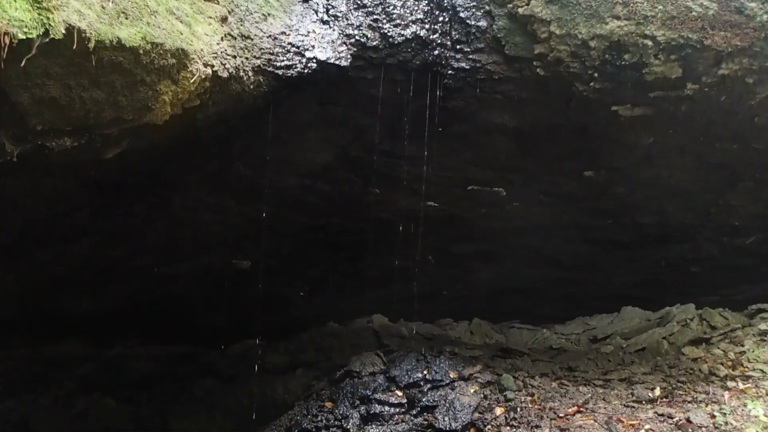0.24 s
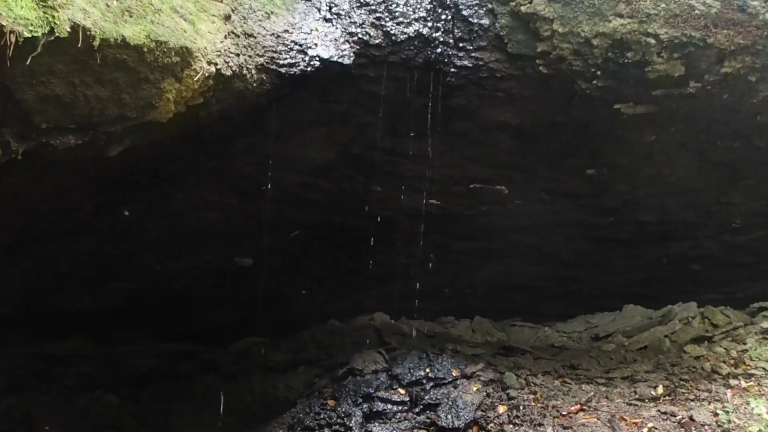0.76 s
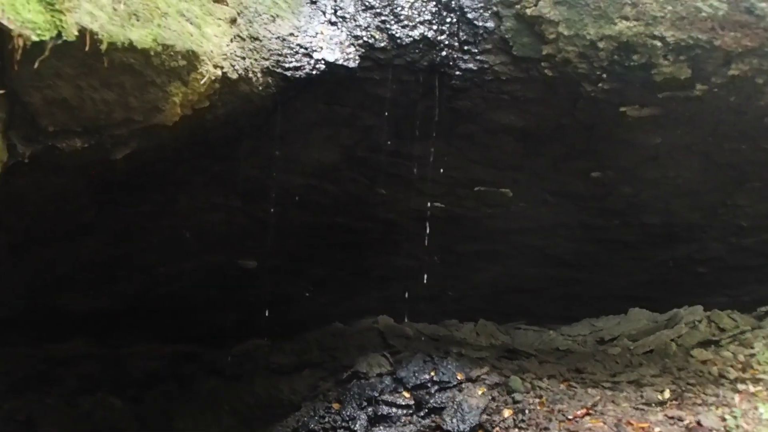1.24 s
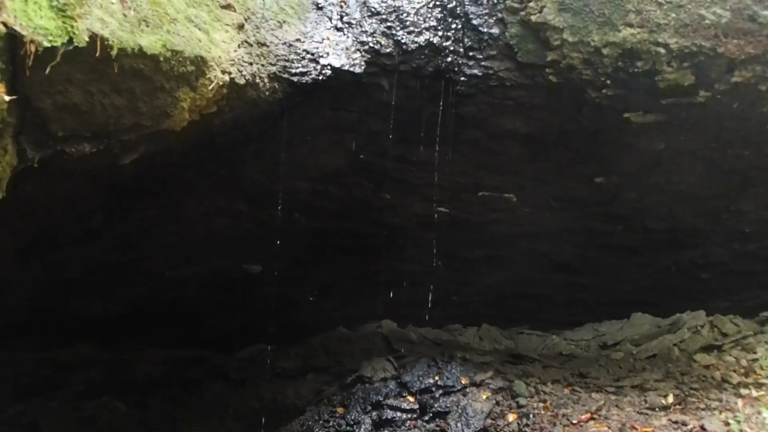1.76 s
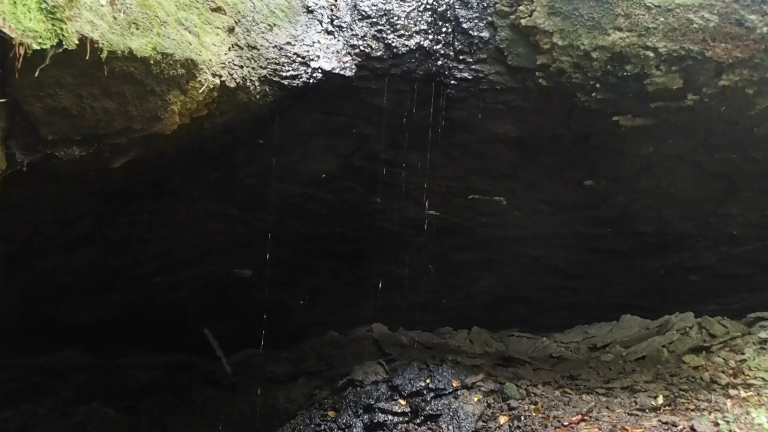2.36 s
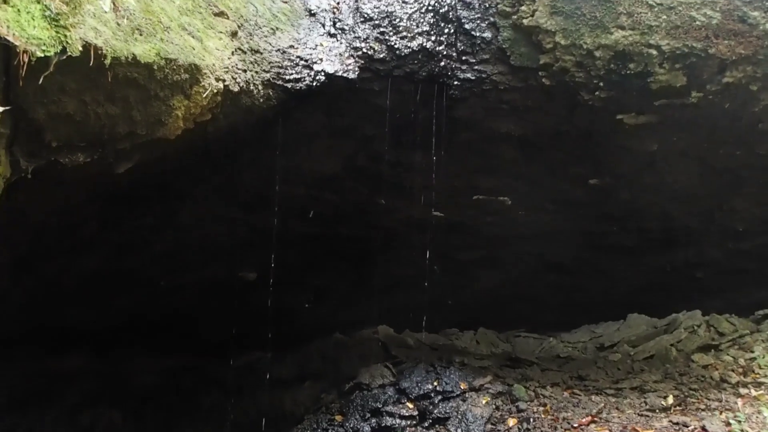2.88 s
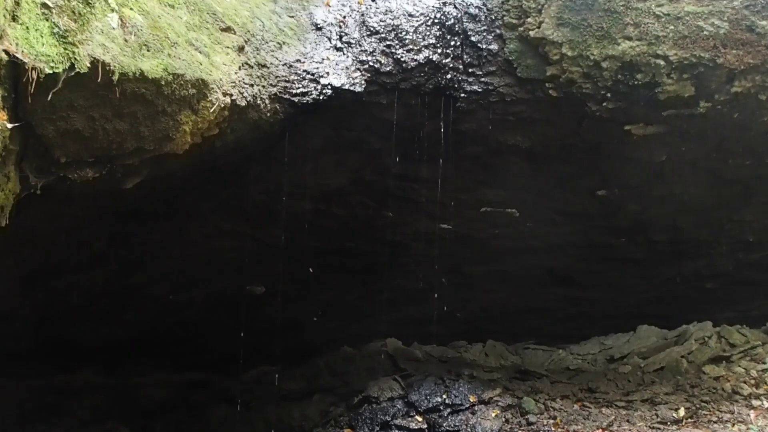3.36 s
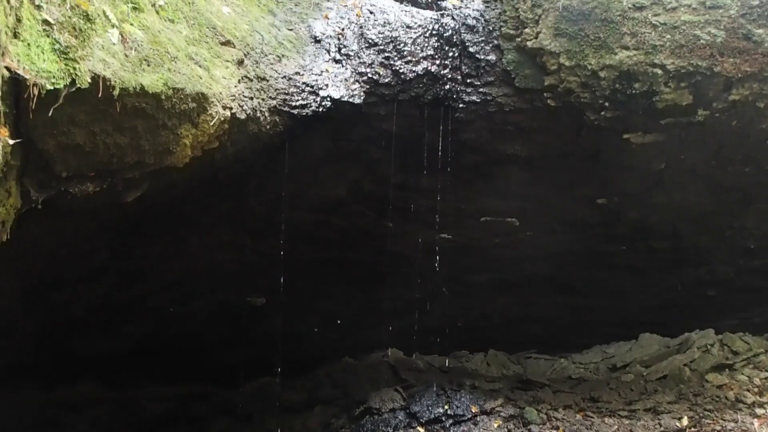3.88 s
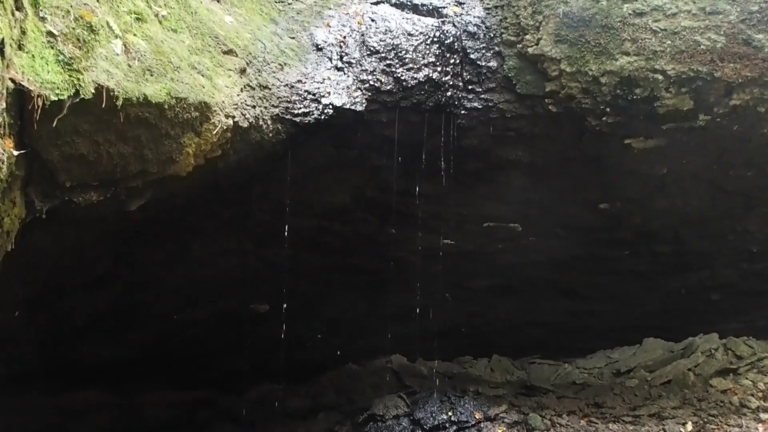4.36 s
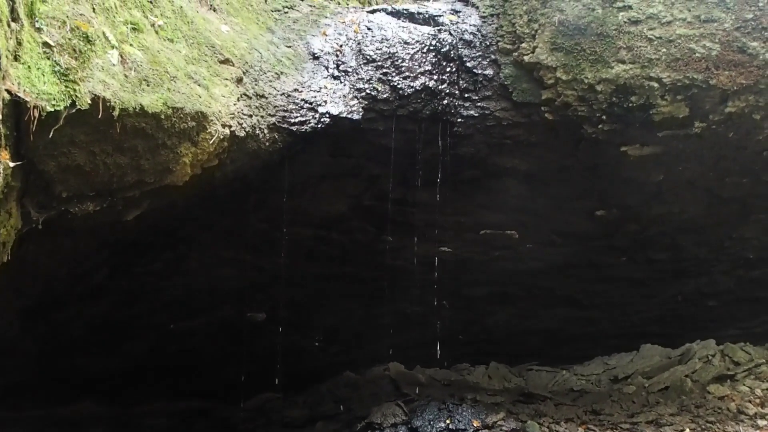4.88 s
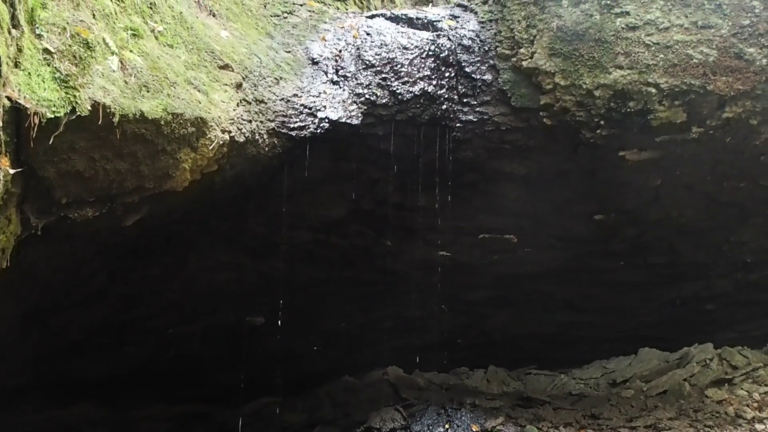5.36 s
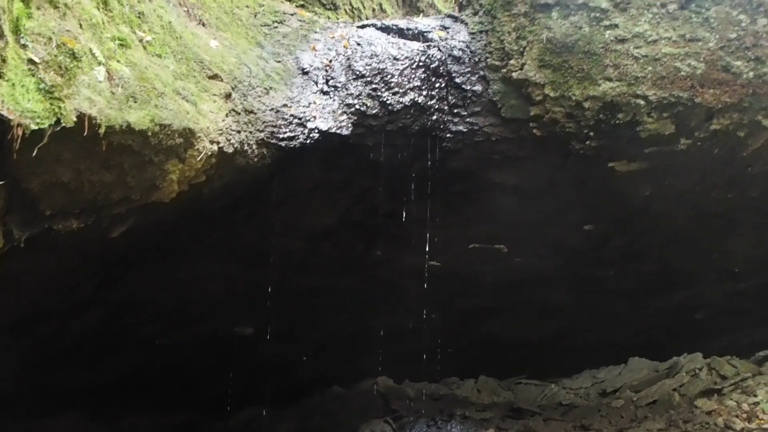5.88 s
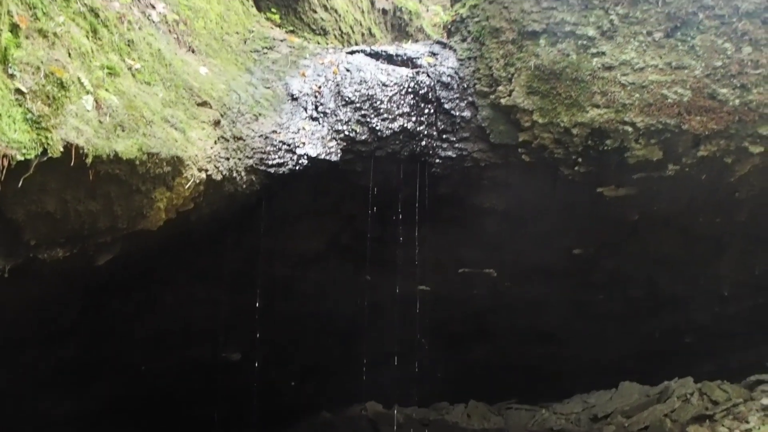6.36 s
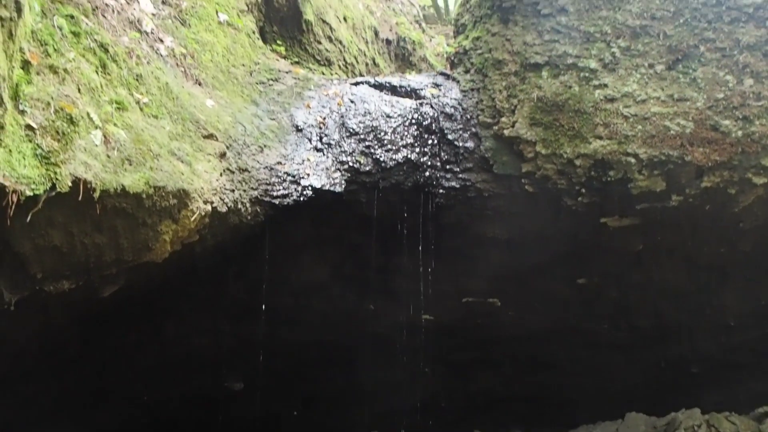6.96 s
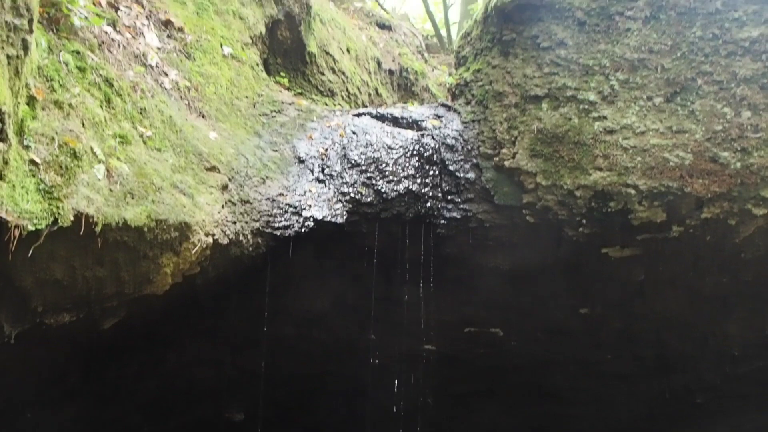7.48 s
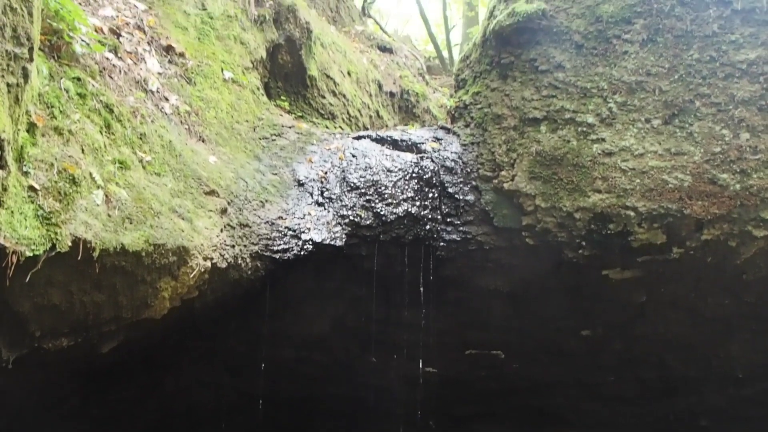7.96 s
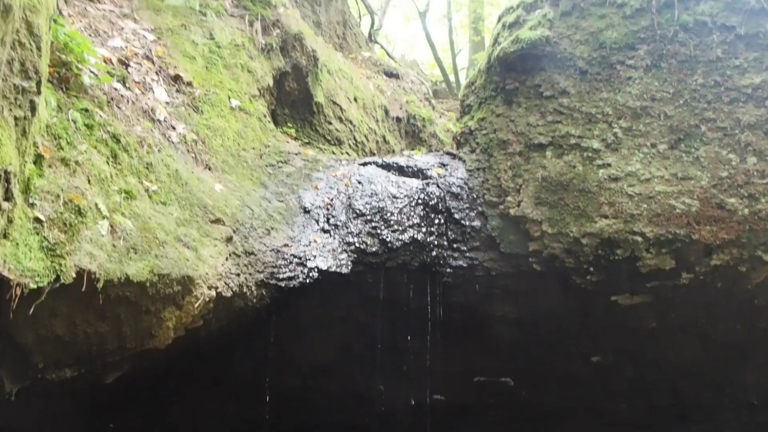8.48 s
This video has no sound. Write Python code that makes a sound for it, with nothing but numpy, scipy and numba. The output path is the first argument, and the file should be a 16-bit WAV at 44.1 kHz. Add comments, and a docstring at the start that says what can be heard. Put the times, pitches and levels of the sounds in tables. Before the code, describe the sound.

From the first instant to the end at about 8.7 seconds, water drips onto wet stones under a rock overhang, a few metres from a stereo microphone. The drops are irregular and dense, many each second: short bright pops with a wet slap, a small knock and a hiss of spray. Faint fine patter fills the gaps. Louder drops stand out near 0.6, 1.1, 1.2, 3.5 and 5.8 seconds, with lesser accents around 2.0, 4.5, 6.1 and 6.4. Low, quiet bubble plops in a puddle come now and then, for instance at 1.2, 2.5, 3.2 and 8.2, and dull soft-ground thuds near 2.5 and 4.0. The dripping thins a little around 4.9 and 7 seconds, without stopping. Stones and roof return immediate tight echoes, slightly ringing, with a tail of about a tenth of a second. A faint, wide, steady forest hush lies underneath.

```python
"""Under a rock overhang in a forest, water drips onto wet stones a few metres from a small stereo recorder.
Each drop is a cluster of short tone bursts: a pop at its own pitch, a slap, a knocking body and thrown spray.
Stones and the rock roof echo it at once, and the hollow rings on briefly as decaying noise. Faint patter fills
the gaps, a few drops plop into a puddle as low bubble tones, and a few thud on soft ground.
Under it all lies the steady hush of the forest, made of filtered noise."""
import sys
import numpy as np
from scipy import signal
from scipy.fft import rfft, irfft
from scipy.io import wavfile
from numba import njit

SR = 44100
rng = np.random.default_rng(int(sys.argv[2]) if len(sys.argv) > 2 else 0)


def persist_wave(psi):
    """Save psi, clipped to +-1, as 16-bit WAV."""
    counts = np.round(np.clip(psi, -1, 1) * 32767).astype(np.int16)
    wavfile.write(sys.argv[1], SR, np.atleast_2d(counts).T)


N = 384993


def undb(db):
    """Gain of a dB value."""
    return 10 ** (np.asarray(db) / 20)


def on_log_hz(table, hz):
    """Reads (Hz, value) points on a log-frequency axis."""
    point_hz, value = np.transpose(table)
    return np.interp(np.log(np.maximum(hz, 1)), np.log(point_hz), value)


def colour(x, gain_db, size=2048):
    """Causal filter whose dB gain is a function of Hz, made from the folded cepstrum."""
    bin_hz = np.arange(size // 2 + 1) * SR / size
    cepstrum = irfft(np.log(undb(gain_db(bin_hz))))
    # folding the later half onto the earlier one gives minimum phase
    cepstrum[1:size // 2] *= 2
    cepstrum[size // 2 + 1:] = 0
    impulse = irfft(np.exp(rfft(cepstrum)))
    return signal.fftconvolve(x, impulse)[:N]


@njit
def grains(start, hz, cycles, size, count):
    """Tone bursts that swell over 'cycles' periods to an envelope peak of 'size' and die away."""
    out = np.zeros(count)
    for g in range(len(start)):
        tau = cycles[g] * SR / hz[g]  # swell in samples
        first = int(start[g] * SR) + 1
        for i in range(first, min(first + int(5 * tau), count)):
            n = i - start[g] * SR
            envelope = (n / tau * np.exp(1 - n / tau)) ** 2
            out[i] += size[g] * envelope * np.sin(2 * np.pi * hz[g] * n / SR)
    return out


def hush():
    """Steady forest air and far water: mid and side noise, so partly alike at both ports."""
    # Spectrum of the hush. Each row: frequency in Hz, relative density in dB per Hz.
    mid_spectrum = [(20, -12), (50, -2), (120, 1), (270, -5.5), (700, -6), (1020, -6.5), (1300, -13.5),
                    (1700, -11.5), (3000, -12), (8800, -16), (12500, -17), (16000, -26)]
    # Stereo width of the hush. Each row: frequency in Hz, side minus mid in dB.
    side_minus_mid = [(25, -5), (120, -6), (250, -1.5), (700, -5), (2000, -0.5), (8000, 2)]
    mid_level_db = -55  # RMS

    def mid_db(hz):
        return on_log_hz(mid_spectrum, hz)

    def side_db(hz):
        return mid_db(hz) + on_log_hz(side_minus_mid, hz)

    mid = colour(rng.standard_normal(N), mid_db, size=8192)
    side = colour(rng.standard_normal(N), side_db, size=8192)
    return np.array([mid + side, mid - side]) * undb(mid_level_db) / np.std(mid)


def splash(s, level_db, pop_hz, slap_db, body_db, spray_db):
    """A drop as grains (s, Hz, cycles, size): pop, slap on stone, body, crackle, spray and spatter."""
    chance = rng.random((len(s), 28)).T
    one = np.ones(len(s))
    parts = [(s, pop_hz, 1.44 * one, undb(level_db - 7.5))]
    slap_hz = 1600 + 600 * chance[0]
    parts.append((s, slap_hz, 1.1 * one, undb(level_db + slap_db)))
    for k in range(2):  # the body of the splat knocks at middle pitches
        body_s = s + 0.00122 * chance[4 + k]
        body_hz = 2500 * 1.95 ** ((k + chance[1 + k]) / 2)
        parts.append((body_s, body_hz, 0.78 * one, undb(level_db + body_db)))
    # the water sheet tears near the pitch of the pop
    crack_hz = np.clip(pop_hz * 1.3 ** (chance[3] - .4), 1500, 13000)
    parts.append((s + .0025 * chance[6], crack_hz, 0.87 * one, undb(level_db - 12.5)))
    for k in range(6):  # fine spray hisses out over a few milliseconds, later flecks fainter
        fleck_hz = 5500 * 3.02 ** ((k % 3 + chance[7 + k]) / 3)
        late = .006 * chance[13 + k] ** 1.5
        parts.append((s + late, fleck_hz, 1.28 * one, undb(level_db + spray_db - 320 * late)))
    for k in range(3):  # thrown droplets fall back later, each with a small pitch of its own
        spatter_s = s + 0.011 + 0.038 * chance[22 + k]
        spatter_hz = np.clip(pop_hz * 2.43 ** (chance[19 + k] - .4), 1500, 13000)
        spatter_db = level_db - 18.5 - 10.6 * chance[25 + k]
        parts.append((spatter_s, spatter_hz, 1.35 * one, undb(spatter_db)))
    return np.array(parts)


def clear_drops():
    """The drops that stand out one by one, each splashing on stone."""
    # Each row: start in seconds, drop level in dB, pop pitch in Hz,
    # then slap, body and spray in dB relative to the drop level.
    drop_rows = [(0.0001, -37, 1950, -10, -2.5, -14), (0.0288, -33.5, 3220, -25, -10.5, -27),
                 (0.0642, -34, 3200, -18, -9, -24), (0.116, -30.5, 4030, -21, -15, -12),
                 (0.209, -34.5, 4240, -29, -7, -12), (0.315, -37, 6150, -18, -10, -10),
                 (0.3286, -35, 8040, -19, -10, -13), (0.343, -35, 8020, -20, -25, -8),
                 (0.3684, -29.5, 3280, -9, -14, -14), (0.4127, -38, 8060, -13, -9, -10),
                 (0.453, -37.5, 8000, -28, -11, -6), (0.521, -34, 3200, -27, -16, -10.5),
                 (0.6135, -19.5, 3260, -22, -12.5, -20), (0.6485, -37, 3710, -24, -19, -13),
                 (0.6634, -36, 3750, -25, -18, -13), (0.6769, -34, 6330, -26, -15, -17),
                 (0.6954, -30, 6550, -15, -19, -23), (0.71, -30, 3800, -13, -17, -16),
                 (0.727, -39, 6100, -25, -14, -9), (0.834, -30.5, 6040, -30, -19, -11.5),
                 (0.8752, -31, 6690, -22, -10, -21), (0.8912, -32, 6900, -15, -17, -14),
                 (0.98, -29, 4330, -14, -9.5, -17), (1.0054, -34.5, 2760, -9, -4, -11),
                 (1.0159, -35, 2600, -16, -10, -14), (1.038, -36, 5800, -19, -17, -15),
                 (1.1013, -39.5, 4130, -11, -8, -12), (1.136, -17, 3180, -17, -31, -21),
                 (1.1623, -29, 3140, -10, -13, -8.5), (1.177, -38, 3180, -16, -20, -9),
                 (1.215, -42, 4600, -25, -22, -20), (1.2352, -27, 7000, -25, -20, -16),
                 (1.2394, -22, 3060, -23, -9, -19), (1.264, -32, 3670, -24, -23, -30),
                 (1.2805, -34, 2920, -8, -13, -28), (1.3004, -31, 7040, -28, -9, -23),
                 (1.354, -35, 6510, -17, -16, -11), (1.388, -39, 4760, -4, -16, -23),
                 (1.421, -31.5, 5030, -33, -10.5, -8.5), (1.4392, -23.5, 2730, -27, -23, -35),
                 (1.465, -34, 2650, -6, -8, -19), (1.4795, -34.5, 3180, -18, -17, -8),
                 (1.4922, -33, 3000, -23, -10, -18), (1.4949, -25, 4600, -23, -9.5, -19),
                 (1.5168, -40, 3140, -18, -10, -27), (1.5734, -35.5, 3200, -16, -5, -12),
                 (1.6228, -32, 10340, -12, -17, -11), (1.7222, -37.5, 5030, -18, -8, -9),
                 (1.738, -38, 3650, -17, -14, -11), (1.759, -35.5, 5140, -11, -9, -8),
                 (1.8047, -30, 2680, -15, -21, -31), (1.86, -24, 2650, -17, -10, -22),
                 (1.889, -32, 3840, -22, -13, -29), (1.8997, -23, 6200, -34, -17, -13.5),
                 (2.0093, -36, 3500, -10, -10, -13), (2.0457, -23.5, 3200, -41, -5.5, -11.5),
                 (2.065, -30.5, 9300, -22, -17, -10), (2.0966, -30.5, 5670, -14, -12, -14),
                 (2.1774, -39, 6240, -27, -7, -9), (2.195, -32.5, 5560, -28, -8, -8),
                 (2.2082, -32.5, 5710, -28, -17, -12), (2.3027, -31.5, 4160, -25, -13, -7),
                 (2.3167, -26, 4600, -20, -9, -16), (2.3584, -38, 3260, -8, -17, -12),
                 (2.3807, -37, 6240, -21, -9, -9), (2.4054, -31.5, 9700, -14, -6.5, -9),
                 (2.436, -34, 4780, -12, -8, -11), (2.4558, -32.5, 2720, -8, -9, -8),
                 (2.4797, -40, 2720, -14, -7, -22), (2.5036, -32.5, 3200, -15, -10.5, -15),
                 (2.5384, -35.5, 7800, -14, -9, -20), (2.57, -34, 4300, -24, -18, -20),
                 (2.609, -32, 5200, -29, -17, -12), (2.6403, -39, 4640, -20, -8.5, -14),
                 (2.798, -35, 4200, -11, -14, -19), (2.9134, -29.5, 2850, -11, -19, -10),
                 (2.935, -31, 3140, -19, -5, -11.5), (2.969, -33.5, 3760, -11, -10, -15),
                 (3.003, -33.5, 2800, -11, -10, -14), (3.0614, -33, 6300, -17, -13, -6),
                 (3.0941, -32.5, 3250, -25, -21, -10), (3.1114, -37, 5260, -10, -6, -17),
                 (3.2265, -30.5, 4750, -10.5, -10.5, -7.5), (3.2707, -36, 4700, -25, -9, -24),
                 (3.2958, -32, 6770, -31, -4.5, -11), (3.3295, -29.5, 5900, -25, -16, -16),
                 (3.357, -34.5, 3400, -15, -11, -21), (3.3716, -30.5, 3620, -27, -17, -16),
                 (3.456, -33, 5100, -27, -20, -19), (3.4846, -36, 5870, -29, -19, -12),
                 (3.495, -30, 9500, -33, -16, -9), (3.5181, -28, 5650, -24, -9, -15),
                 (3.5495, -19.5, 2670, -13, -16, -32), (3.5755, -32, 4800, -6, -17, -21),
                 (3.621, -31, 4900, -18, -10, -12.5), (3.671, -34, 5400, -13, -11, -12),
                 (3.7096, -44, 4650, -6, -21, 0), (3.82, -34.5, 5330, -10, -13, -8),
                 (3.8318, -35, 5500, -13, -8, -18), (3.8511, -35, 3780, -17, -13, -27),
                 (3.8744, -34, 4180, -23, -15, -14), (3.941, -30, 5570, -19, -13, -9.5),
                 (3.9536, -37, 7580, -11, -16, -9), (3.956, -33, 3570, -17, -19, -18),
                 (3.97, -36, 1820, -9, -7, -9), (3.985, -37, 1840, -11, -14, -14),
                 (4.0094, -32.5, 3590, -18, -13, -10.5), (4.1038, -25.5, 4940, -31, -18, -17),
                 (4.1152, -28, 5470, -30, -13, -14.5), (4.1435, -32.5, 4260, -13, -9, -13),
                 (4.2627, -28.5, 4670, -21, -10.5, -13), (4.2894, -32, 3760, -19, -22, -13),
                 (4.3874, -36, 3550, -11, -12, -26), (4.4507, -25.5, 2720, -6, -6, -13),
                 (4.483, -35, 2780, -12, -3, -20), (4.5683, -38.5, 4840, -6.5, -3, -14),
                 (4.6201, -26, 5600, -35, -33, -13.5), (4.718, -36, 4750, -21, -22, -16),
                 (4.7418, -37.5, 6140, -18, -10, -11), (4.765, -37, 2270, -7, -10, -22),
                 (4.812, -35.5, 4030, -5, -3, -9.5), (4.899, -42, 4630, -27, -17, -7),
                 (5.031, -38.5, 3030, -25, -12, -10), (5.053, -30.5, 7500, -27, -13, -10),
                 (5.071, -36, 5770, -13, -13, -8), (5.091, -35, 2670, -19, -17, -18),
                 (5.112, -31, 2400, -17, -11, -17), (5.179, -31, 1930, -7, -10, -8),
                 (5.2245, -37, 5700, -17, -5, -9), (5.233, -33.5, 5580, -11, -8.5, -17),
                 (5.2604, -30.5, 5100, -23, -13, -11), (5.349, -33.5, 5560, -14, -7.5, -8),
                 (5.373, -33.5, 4700, -13, -8, -7), (5.4144, -34, 8100, -12, 1, -10),
                 (5.5062, -35, 8850, -12, -9.5, -10), (5.6806, -36.5, 5760, -33, -12, -8),
                 (5.7047, -35, 4540, -14, -8, -10), (5.7236, -33, 4670, -18, -6, -12),
                 (5.7568, -20, 6500, -39, -22, -12.5), (5.772, -27.5, 3430, -32, -16, -22),
                 (5.776, -39, 6310, -24, -14, -16), (5.8189, -34.5, 6820, -24, -12, -10),
                 (5.8412, -33.5, 4870, -22, -11, -10), (5.8605, -25.5, 5000, -16, -16, -14),
                 (5.9594, -29, 5860, -19, -11, -10), (6.027, -36, 3980, -19, -13, -12),
                 (6.0695, -24, 2760, -10.5, -10, -20.5), (6.1304, -30, 10500, -27, -20, -20),
                 (6.1405, -36, 3140, -21, -8, -25), (6.175, -35, 8450, -23, -17, -9),
                 (6.2028, -32, 4570, -27, -17, -8), (6.237, -34.5, 4670, -27, -17, -11),
                 (6.2483, -37, 4500, -12, -12, -11), (6.3328, -36, 6600, -25, -15, -7.5),
                 (6.3637, -22.5, 4740, -37, -17, -15.5), (6.3893, -26.5, 6000, -15, -12, -19),
                 (6.422, -36.5, 3490, -11, -12, -16), (6.459, -26, 6270, -20, -12, -24),
                 (6.4915, -31, 3740, -23, -12, -11), (6.5748, -35.5, 5830, -32, -14, -5),
                 (6.677, -34.5, 6360, -21, -15, -11), (6.6988, -38, 3100, -31, -17, -6),
                 (6.756, -36, 6540, -9, -12, -9), (6.894, -30, 6600, -21, -19, -21),
                 (7.0776, -28, 5040, -17, -14, -9), (7.1243, -34, 6100, -21, -18, -10),
                 (7.3233, -34.5, 5350, -14, -8, -11.5), (7.3424, -37, 3080, -16, -5, -7),
                 (7.3996, -32.5, 2780, -11, -12, -12), (7.4215, -34, 3010, -7, -6, -16),
                 (7.5091, -35.5, 5640, -16, -26, -9.5), (7.547, -32, 6130, -23, -18, -14),
                 (7.561, -32.5, 5990, -16, -12, -9), (7.6018, -26, 7900, -15, -6, -15),
                 (7.644, -30, 3760, -17, -15, -14), (7.6667, -27.5, 5450, -29, -10.5, -10.5),
                 (7.6824, -39, 5990, -21, -18, -3), (7.6916, -39, 4810, -17, -16, -3),
                 (7.7526, -30, 9480, -36, -29, -23), (7.7953, -33, 5900, -6, -7.5, -11),
                 (7.8417, -35.5, 2190, -11, -10, -18), (7.8618, -38, 5620, -19, -2, -14),
                 (7.883, -28.5, 2850, -13, -11, -15.5), (7.9204, -31, 5670, -22, -16, -16),
                 (7.948, -32, 2960, -16, -19, -18), (7.9722, -33.5, 7660, -8, -11, -9),
                 (8.0149, -38, 8800, -30, -21, -18), (8.0896, -32, 5640, -12, -5, -5.5),
                 (8.1354, -28.5, 3000, -27, -10, -26), (8.223, -27.5, 3100, -12, -8.5, -12),
                 (8.3662, -32, 4630, -11, -5, -9), (8.4052, -34, 2230, -18, -10, -18),
                 (8.431, -30, 8850, -14, -14, -14), (8.4516, -34.5, 8100, -18, -17, -8),
                 (8.4943, -39, 2050, -19, -7, -23), (8.6972, -31.5, 8240, -30, -28, -11)]
    return splash(*np.transpose(drop_rows))


def patter():
    """Small drops splash at random moments, most faint and a few louder."""
    # The quietest drops over time. Each row: time in seconds, drop level in dB.
    floor_levels = [(0.0, -45.5), (1.1, -44), (2.2, -47.5), (3.3, -42.5), (4.4, -46), (5.4, -47),
                    (6.2, -44), (7.1, -46.5), (7.9, -45.5), (8.73, -46.5)]
    count, spread_db = 900, 2.5
    slap_db, body_db, spray_db = -14, -13, -12  # relative to the drop level
    chance = rng.random((count, 3)).T
    s = chance[0] * N / SR
    extra_db = -spread_db * np.log(1 - .9 * chance[1])
    level_db = np.interp(s, *np.transpose(floor_levels)) + extra_db
    pop_hz = 2300 * 5.25 ** chance[2]
    return splash(s, level_db, pop_hz, slap_db, body_db, spray_db)


def among_stones(parts):
    """Direct sound, roof echoes and stone bounces, which differ for each drop and port."""
    # Trips to the rock roof, one then two. Each row: left echo in dB, right echo in dB.
    roof_trips = [(-1, -9), (-2, -4)]
    roof_lag_s, roof_scatter_s = .0021, .0004  # for one trip
    roof_skew_s = .00007  # a roof echo reaches the ports up to this far apart
    port_lag_s = .000014  # direct sound comes this much later at the right port
    bounces, spread_s = 4, .004
    s, hz, cycles, size = parts.transpose(1, 0, 2)
    drops = s.shape[1]
    # each drop lands at its own distance
    roof_s = roof_lag_s + roof_scatter_s * rng.random((drops, 2)).T ** 2
    skew_s = roof_skew_s * (2 * rng.random((drops, 2)).T - 1)
    all_hz, all_cycles, all_size = hz.ravel(), cycles.ravel(), size.ravel()
    ports = []
    for port in range(2):
        direct = grains(s.ravel() + port * port_lag_s, all_hz, all_cycles, all_size, N)
        lag = 0.000586 + spread_s * rng.random((drops, bounces)).T[:, None] ** 1.48
        # later bounces are weaker, and either sign may come back
        gain = (2 * rng.random((drops, bounces)).T[:, None] - 1) * np.exp(-lag / spread_s)
        echo = grains((s + lag).ravel(), np.tile(all_hz, bounces), np.tile(all_cycles, bounces),
                      (size * gain).ravel(), N)
        for trip, db in enumerate(roof_trips):
            arrival = s + (trip + 1) * roof_s[trip] + port * skew_s[trip]
            echo = echo + grains(arrival.ravel(), all_hz, all_cycles, all_size * undb(db[port]), N)
        ports.append(direct + echo)
    return direct, np.array(ports)  # the direct sound alone is that of the right port


def hollow(direct):
    """The hollow under the rock gives a short diffuse noise tail, partly shared by the ports."""
    t60_s, own_tail_db = .12, -4.5  # the shared part comes on top of each port's own tail
    t = np.arange(int(.25 * SR)) / SR
    envelope = undb(-60 * t / t60_s) * (1 - np.exp(-t / 0.0071))
    tails = rng.standard_normal((3, len(t))) * envelope
    unit_energy = np.sqrt(np.sum(tails[0] ** 2))
    port_tails = (tails[:2] + .5 * tails[2]) * undb(own_tail_db) / unit_energy
    return signal.fftconvolve(direct[None], port_tails, axes=1)[:, :N]


def ring(x):
    """The gaps between rock and stones lift a few pitches: resonances added to the sound."""
    # Each row: pitch in Hz, bandwidth in Hz, level of the added resonance in dB.
    gaps = [(1020, 110, 9), (1566, 170, 3), (2225, 22, 4.5), (2715, 13.3, 8.5), (3200, 110, -5),
            (3607, 47, 3), (4070, 62, 0), (4810, 310, -6.5), (5700, 150, -9)]
    lifted = x
    for hz, width, db in gaps:
        b, a = signal.iirpeak(hz, hz / width, SR)
        lifted = lifted + undb(db) * signal.lfilter(b, a, x)
    return lifted


def thuds():
    """Heavy drops on soft ground: one soft push of air, then a short smack of mud."""
    # Each row: start in seconds, push level in dB, push pitch in Hz.
    thud_rows = [(0.006, -43, 1500), (2.458, -39, 1300), (2.507, -44, 800), (3.0, -47, 180),
                 (3.961, -38, 1500), (3.9748, -38, 605), (3.9859, -39.5, 800), (7.428, -48, 700)]
    s, level_db, hz = np.transpose(thud_rows)
    # the push swells for a quarter of a cycle only
    push = grains(s, hz, np.full(len(s), .25), -undb(level_db), N)
    smack_hz, smack_cycles = np.full(len(s), 1750.), np.full(len(s), 2.5)
    smack = grains(s + 0.00089, smack_hz, smack_cycles, undb(level_db - 5.0), N)
    return push + smack


def plops():
    """A bubble trapped in the puddle rings at one low pitch."""
    # Each row: start in seconds, bubble level in dB, bubble pitch in Hz.
    plop_rows = [(0.38, -53.5, 1070), (1.144, -57, 1010), (1.166, -54, 1040), (1.186, -51, 1030),
                 (1.238, -48.5, 1080), (1.809, -53.5, 1060), (2.099, -54, 1080), (2.194, -59, 1040),
                 (2.46, -48.5, 1050), (2.51, -49, 990), (3.003, -55, 1130), (3.231, -52, 1170),
                 (3.579, -54, 1050), (3.73, -54.5, 860), (3.971, -52, 1060), (4.246, -57, 1160),
                 (6.781, -55.5, 1180), (7.427, -53, 1017), (7.786, -52, 676), (7.927, -54, 1040),
                 (8.191, -55, 990), (8.227, -49, 990)]
    swell_s = 0.0029
    s, level_db, hz = np.transpose(plop_rows)
    return grains(s, hz, swell_s * hz, undb(level_db), N)


def ground_path(water):
    """The way over the ground and into the two microphones colours each port differently."""
    # Path with its dip. Each row: frequency in Hz, gain in dB.
    path = [(600, 3), (1100, 9.5), (1300, -1), (1550, -4), (3000, 1.5), (6000, 4.5), (9000, 8.5),
            (12000, 5), (16000, -9)]
    # Difference of the ports. Each row: frequency in Hz, left minus right in dB.
    left_minus_right = [(500, -5.5), (1200, 1), (2000, -1.5), (2700, 6), (3600, 1), (5500, 4), (7000, 0),
                        (8500, -1.5), (11000, -6), (13000, 4.5)]
    ports = []
    for x, sign in zip(water, (1, -1)):
        def gain_db(hz):
            return on_log_hz(path, hz) + sign * on_log_hz(left_minus_right, hz) / 2
        ports.append(colour(x, gain_db))
    return np.array(ports)


def scene():
    """Drops land at three spots, each with its own echoes; all water passes the ground path."""
    drops = np.concatenate([clear_drops(), patter()], axis=2)
    # a drop on stone is too small to sound much below 1350 Hz
    small_drop = signal.butter(4, 1350, "high", fs=SR, output="sos")
    low = plops() + ring(thuds())
    water = low + 0.9 * hollow(low)
    for spot in range(3):  # every third drop falls at the same spot
        direct, near = among_stones(drops[:, :, spot::3])
        on_stone = signal.sosfilt(small_drop, near + hollow(direct))
        water = water + ring(on_stone)
    return ground_path(water) + hush()


def record(dry):
    """The recorder cuts the top above 15.9 kHz and sits on a small constant offset."""
    top_cut = signal.ellip(10, .2, 70, 15900, fs=SR, output="sos")
    return signal.sosfilt(top_cut, dry) - .0024


dry = scene()
out = record(dry)
persist_wave(out)
```